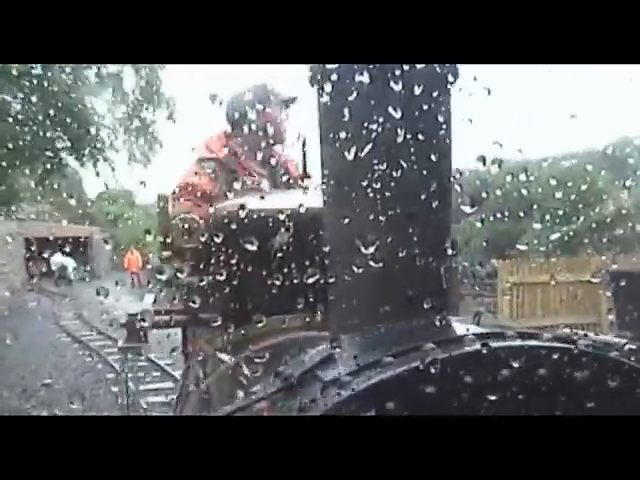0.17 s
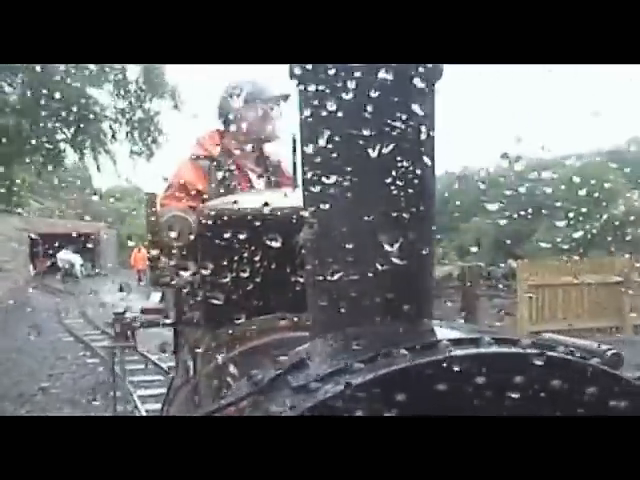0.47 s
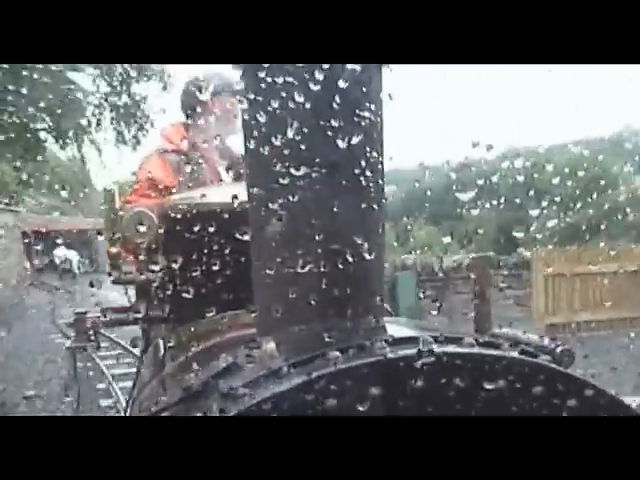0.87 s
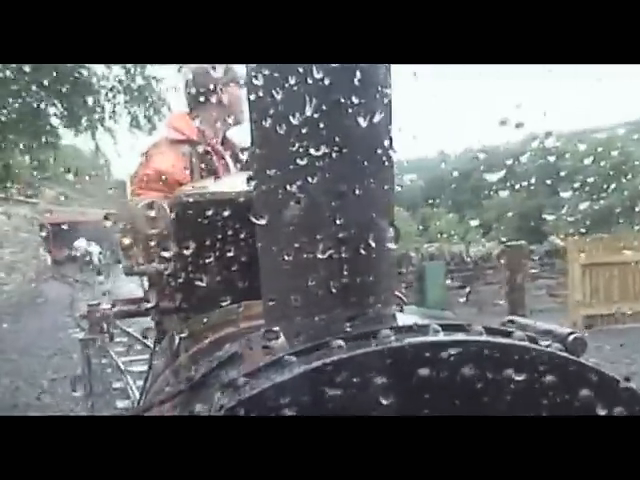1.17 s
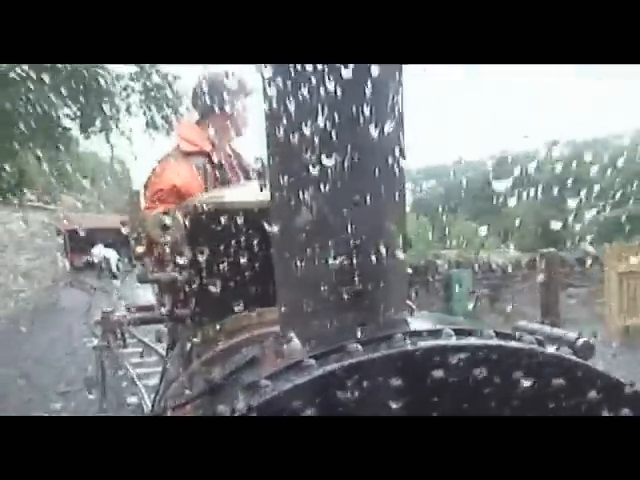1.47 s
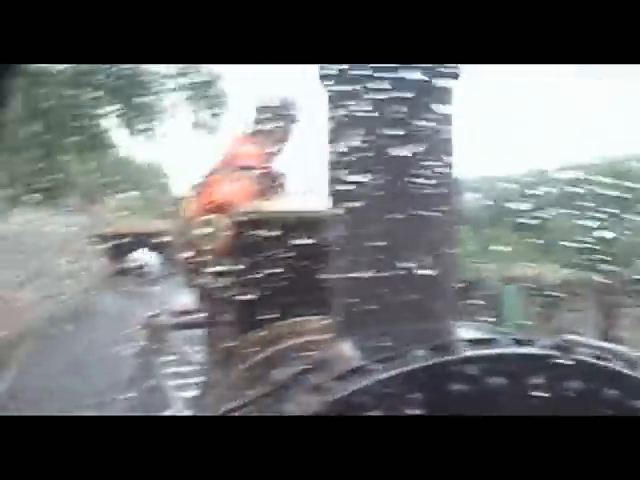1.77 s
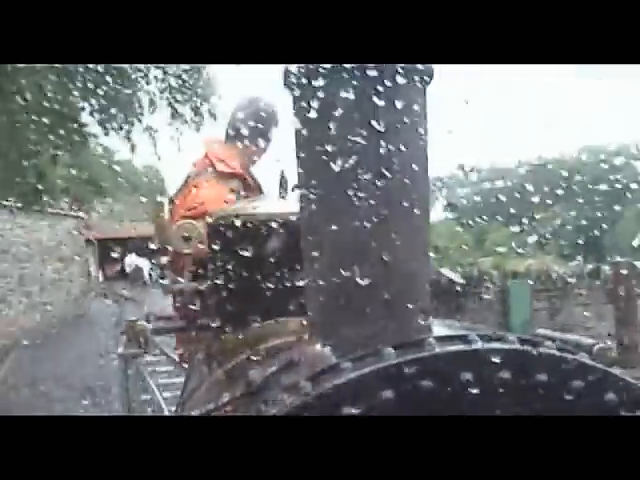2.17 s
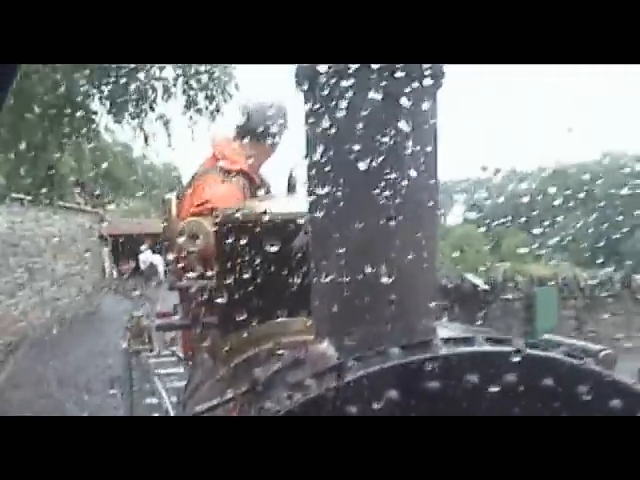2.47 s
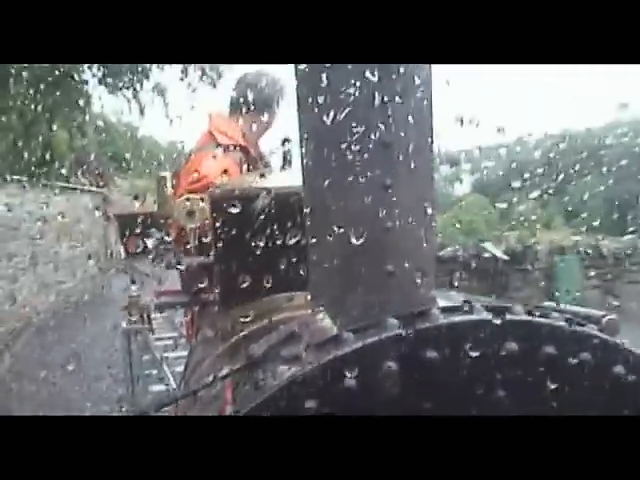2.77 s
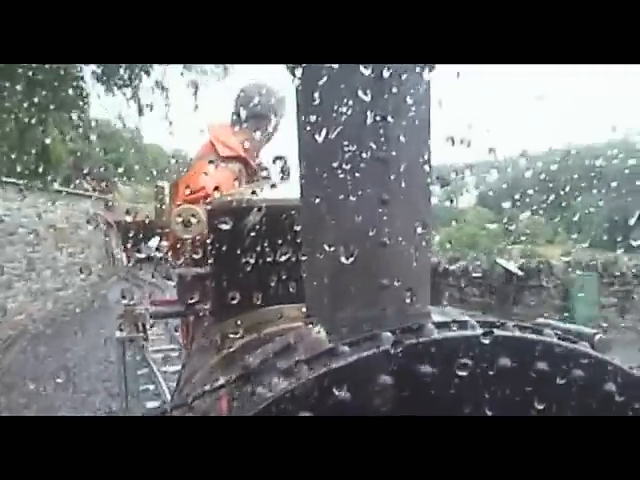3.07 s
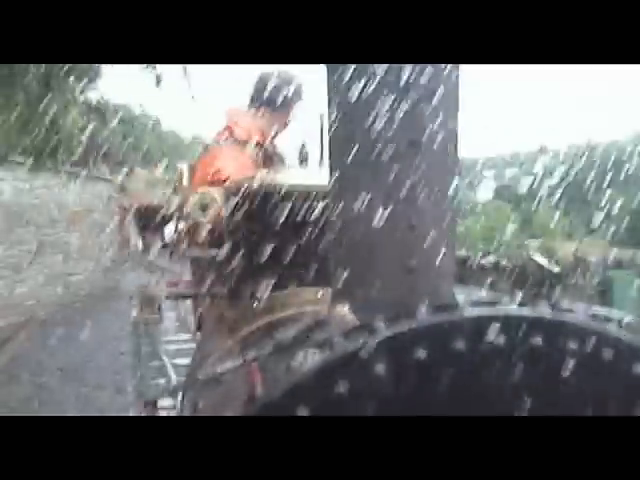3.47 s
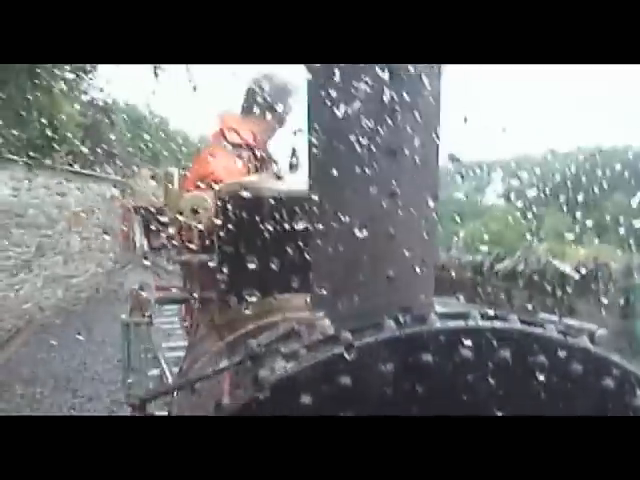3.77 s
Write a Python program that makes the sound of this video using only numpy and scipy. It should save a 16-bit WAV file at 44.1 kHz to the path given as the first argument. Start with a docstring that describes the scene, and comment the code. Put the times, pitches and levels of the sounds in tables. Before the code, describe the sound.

Low carriage rumble on a narrow track, with droning panels, iron clanks and very faint rain hiss

```python
"""A small carriage rumbles and drums in the rain behind a gently rolling narrow gauge steam locomotive.
Heard in stereo from the carriage seat: shaped noise makes the body rumble, and wavering tones make two
panels drum and the floor jolt. Couplings clank, ironwork clinks, a latch knocks and wheels scrape, as
noise bursts with ringing modes. Further down lie the wheels' roar, brief squeaks of narrow noise, and a
faint hiss of steam and rain."""
import sys
import numpy as np
from scipy import signal
from scipy.fft import rfft, irfft
from scipy.io import wavfile
from scipy.ndimage import uniform_filter1d

SR = 44100
rng = np.random.default_rng(int(sys.argv[2]) if len(sys.argv) > 2 else 0)


def generate_wav(signal):
    """Clip the signal to [-1, 1] and save it as 16-bit WAV at the path in sys.argv[1]."""
    frames = np.transpose(np.atleast_2d(signal))
    scaled = np.clip(frames, -1, 1) * 32767
    pcm = np.round(scaled).astype(np.int16)
    wavfile.write(sys.argv[1], SR, pcm)


N = 172431
TIME, HZ = np.arange(N) / SR, np.fft.rfftfreq(N, 1 / SR)


def amp(db):
    """Turns decibels into gain."""
    return 10 ** (np.asarray(db) / 20)


def unit(x):
    """Scales a sound to rms 1."""
    return x / np.sqrt(np.mean(x ** 2) + 1e-20)


def at_hz(points, hz=HZ):
    """Reads a spectrum table along a logarithmic frequency axis."""
    f, value = np.transpose(points)
    return np.interp(np.log(hz + 1), np.log(f + 1), value)


def curve(points, axis=1):
    """Reads one column of a time table at every sample."""
    rows = np.array(points)
    return np.interp(TIME, rows[:, 0], rows[:, axis])


def add(mix, s, sound):
    """Mixes a sound in at time s, cutting what runs past the end."""
    part = mix[:, max(round(s * SR), 0):][:, :sound.shape[1]]
    part += sound[:, :part.shape[1]]


def drift(rate_hz):
    """Chance wandering of rms 1, with little movement faster than the given rate."""
    lowpass = np.exp(-(HZ / rate_hz) ** 2) * (HZ > 0)
    return unit(irfft(rfft(rng.standard_normal(N)) * lowpass, N))


def lifted(peaks):
    """Gain of a set of broad resonances and hollows."""
    return amp(sum(db / (1 + ((HZ - hz) / (width / 2)) ** 2) for hz, width, db in peaks))


# stereo spread, nearly mono in the bass: (frequency [Hz], side relative to mid [dB])
WIDTH = [(40, -30.5), (140, -27.5), (260, -16), (500, -6), (1000, -9), (2500, -3.5), (5000, -7.5),
         (9000, -6.5)]


def noise(gain):
    """Stereo noise of a given colour, built from independent mid and side noises."""
    mid, side = rfft(rng.standard_normal((2, N)))
    side = side * amp(at_hz(WIDTH))
    return unit(irfft(np.array([mid + side, mid - side]) * gain, N))


def steadied(x, span_s, share):
    """Takes a share of the slow chance swells out of a noise."""
    power = uniform_filter1d((x ** 2).mean(0), max(int(span_s * SR), 1))
    return unit(x / (abs(power) + 1e-9) ** (share / 2))


# resonances of the carriage body around the seat: (frequency [Hz], width [Hz], level [dB])
CARRIAGE = [(36.7, 17, -4.5), (54.6, 14, 2), (98.6, 13, 0), (140, 27.3, 0), (168.5, 16.8, -0.5),
            (194.2, 18, -1), (224, 7.4, -2.5), (253.4, 30.3, -6), (315.3, 30.3, -7), (351, 25.5, -15.5),
            (502, 14, -25.5), (576, 16, -24)]
# sway of the rumble, used as departures from each column's mean:
# (time [s], deep bass level [dB], upper rumble level [dB])
SWAY = [(0, -39, -37), (.3, -42, -34.5), (.42, -40, -32), (.8, -42, -34), (1.0, -44.5, -32),
        (1.27, -35, -29), (1.4, -35, -31.5), (1.65, -36, -29), (1.87, -33, -33.5), (2.08, -37, -28.5),
        (2.35, -37, -32.5), (2.65, -36.5, -33), (2.87, -37, -32.5), (3.05, -42, -32), (3.38, -34.5, -30),
        (3.55, -32.5, -32), (3.75, -32, -35), (3.91, -34, -35)]
RUMBLE_DB, RUMBLE_SPLIT_HZ = -30.5, 78


def rumble():
    """Rail roughness shakes the springs and panels, heard as noise through the body's resonances."""
    power = sum(amp(db) ** 2 / (1 + ((HZ - hz) / (0.71 * width)) ** 2) ** 2 for hz, width, db in CARRIAGE)
    low_cut = (HZ / 22) ** 4 / (1 + (HZ / 22) ** 4)
    gain = np.sqrt(power) * low_cut
    out = np.zeros((2, N))
    for k, band in enumerate([HZ < RUMBLE_SPLIT_HZ, HZ >= RUMBLE_SPLIT_HZ]):
        level = curve(SWAY, axis=k + 1)
        sway_db = 0.92 * (level - level.mean())
        share = np.linalg.norm(gain * band) / np.linalg.norm(gain)
        body = steadied(noise(gain * band), span_s=0.11, share=0.4)
        out += share * body * amp(RUMBLE_DB + sway_db)
    return out


def panel(hz, wander_hz, level_db):
    """A loose panel hums on one wavering note whose level flutters."""
    turns = np.cumsum(hz + wander_hz * drift(9.43)) / SR
    return unit(np.sin(2 * np.pi * turns)) * amp(level_db + 1.5 * drift(27))


# the drumming panel, before its trim: (time [s], level [dB])
DRUMMING = [(0, -24), (.05, -30.5), (.09, -42.5), (.19, -38.5), (.255, -22), (.31, -42.5), (.53, -32.5),
            (.85, -38.5), (1.0, -27), (1.09, -29), (1.2, -25), (1.29, -39), (1.64, -43), (1.71, -25.5),
            (1.79, -44), (2.08, -38), (2.15, -23.5), (2.22, -38), (2.42, -35), (2.52, -23.5), (2.6, -39),
            (2.9, -29.5), (3.0, -43), (3.27, -38), (3.35, -28.5), (3.5, -33.5), (3.68, -47), (3.85, -26.5),
            (3.91, -51)]
# a smaller panel that drones higher, before its trim: (time [s], level [dB])
DRONING = [(0, -53), (.3, -43.5), (.52, -35), (.75, -49.5), (1.0, -34), (1.22, -36), (1.36, -43.5),
           (1.55, -37.5), (1.72, -34.5), (1.87, -49.5), (2.05, -32), (2.25, -39.5), (2.6, -45),
           (3.0, -37.5), (3.3, -44.5), (3.5, -38), (3.72, -50), (3.87, -38.5)]
DRUM_HZ, DRUM_WANDER_HZ, DRUM_TRIM_DB = 164.1, 5.43, -2.5
DRONE_HZ, DRONE_WANDER_HZ, DRONE_TRIM_DB = 259.4, 4.93, -2


def drumming_panels():
    """Two panels drum above the rest of the body, each swelling on its own note."""
    drum = panel(DRUM_HZ, DRUM_WANDER_HZ, DRUM_TRIM_DB + curve(DRUMMING))
    drone = panel(DRONE_HZ, DRONE_WANDER_HZ, DRONE_TRIM_DB + curve(DRONING))
    return drum + drone


# jolts from uneven rail, felt in the floor: (time [s], frequency [Hz], peak level [dB])
JOLTS = [(0.366, 91.6, -27.5), (0.914, 96.7, -29), (1.221, 247, -26), (1.495, 192, -27.5),
         (1.962, 188, -31.5), (2.115, 323, -30), (2.639, 96, -31), (2.80, 185, -27), (2.826, 153, -26),
         (2.88, 133, -28), (3.166, 235.5, -29), (3.304, 129, -22.5), (3.37, 129.4, -23.5)]
JOLT_RISE_S = .022


def jolts():
    """Bumps in the track make low tones swell and fade in the carriage floor."""
    t, out = np.arange(SR // 3) / SR, np.zeros((2, N))
    swell = (t / JOLT_RISE_S * np.exp(1 - t / JOLT_RISE_S)) ** 2
    for (s, hz, db), phase in zip(JOLTS, rng.random(len(JOLTS))):
        tone = np.sin(2 * np.pi * (hz * t + phase))
        add(out, s, (amp(db) * swell * tone)[None])
    return out


# ringing of the wheels and frame, also colouring every blow: (frequency [Hz], width [Hz], lift [dB])
FRAME = [(568, 11, 4.5), (624, 20, 6.5), (715, 33, 4.5), (895, 140, 3), (996, 13, 4.5), (1063, 53, 7),
         (1195, 97, 4), (1332, 68, 4), (1620, 16, 6), (1927, 21, 4), (2550, 330, 2.5), (3980, 39, 6)]
# centres of the thud, body, clang, edge and sizzle bands: frequency [Hz]
BANDS_HZ = [350, 750, 1900, 4200, 8000]
# t60 of each band's clatter: share of the blow's t60 [ratio]
BAND_DECAY = [1.38, 1.22, 1.28, 0.76, 0.63]
HOLD_S, TAIL_DB, TAIL_T60_S = 0.0025, -23.5, 0.73
CHATTER_DB, RING_FLUTTER_DB = 1.5, 1.5  # rms
FAVOUR_SPREAD = .04  # share of its frequency within which a favoured note lifts the modes


def clatter_bands(body):
    """Splits noise coloured by the frame and the struck part into five overlapping bands."""
    logs = np.log(BANDS_HZ)
    low_cut, high_cut = 1 / (1 + (220 / (HZ + 1)) ** 4), 1 / (1 + (HZ / 9300) ** 12)
    colour = low_cut * high_cut / (HZ + 300) ** 1.41 * lifted(FRAME + body)
    return [noise(colour * np.sqrt(np.interp(np.log(HZ + 1), logs, row))) for row in np.eye(len(logs))]


def blows(events, modes, body, clatter_db):
    """Each contact chatters briefly, then dies away as a dense clatter and clear modes of the iron."""
    logs, out = np.log(BANDS_HZ), np.zeros((2, N))
    bands = clatter_bands(body)
    chatter, flutter = amp(CHATTER_DB * drift(200)), RING_FLUTTER_DB * drift(90)
    for s, rise, t60, ring_db, *columns in events:
        levels, favoured = columns[:len(logs)], columns[len(logs):]
        start = round(s * SR)
        span = slice(start, start + SR // 2)  # a blow lasts half a second at most
        t = TIME[span] - TIME[span][0]
        attack = np.minimum(t / max(rise, 1e-4), 1)
        after = np.maximum(t - rise - HOLD_S, 0)
        tail = amp(TAIL_DB - 60 * after / TAIL_T60_S)
        sound = np.zeros((2, len(t)))
        for band, db, share in zip(bands, levels, BAND_DECAY):
            decay = np.hypot(amp(-60 * after / (t60 * share)), tail)
            sound += band[:, span] * amp(db + clatter_db) * decay
        sound *= chatter[span]
        chances = rng.uniform(-1, 1, (len(modes), 3))
        for (hz, db, ring_s), (phase, spread, detune) in zip(modes, chances):
            level = np.interp(np.log(hz), logs, levels) + db + ring_db
            if favoured:
                favoured_hz, lift_db = favoured
                level += lift_db * np.exp(-(np.log(hz / favoured_hz) / FAVOUR_SPREAD) ** 2)
            stereo_phase = spread * np.array([[1], [-1]]) / 2
            angle = 2 * np.pi * hz * (1 + 0.0038 * detune) * t + np.pi * phase + stereo_phase
            rattle = np.roll(flutter, int(spread * N))[span]
            sound += amp(level + rattle - 60 * after / ring_s) * np.sin(angle)
        add(out, s, attack * sound)
    return out


# coupling blows; where one lands decides which note it favours. Band levels are before the clatter trim:
# (time [s], rise [s], t60 [s], ringing relative to bands [dB], thud [dB], body [dB], clang [dB],
#  edge [dB], sizzle [dB], favoured note [Hz], its lift [dB])
CLANKS = [ (.351, 0.0065, .13, -4, -31.5, -36.5, -51, -56, -82, 895, 3),
          (.373, .0035, .13, -8.5, -42, -44.5, -47.5, -58, -73, 1355, 9),
          (1.240, 0.0067, 0.1, -5.5, -27.5, -35, -41, -48, -80, 1790, -1),
          (1.544, 0.0045, 0.18, -3, -35, -42.5, -50, -52, -64, 962, 4.5),
          (1.671, 0.0074, 0.21, -7, -41, -43, -35.5, -43.5, -52.5, 895, 22.5),
          (1.712, 0.014, .14, 2, -42, -50, -49.5, -53, -76, 1790, 7),
          (1.741, .0048, .16, -3, -41.5, -41.5, -41, -47, -67, 3695, 10),
          (1.751, .003, .08, -9, -47, -46, -47, -59, -75, 1052, 9),
          (2.121, 0.0027, .12, -12, -32.5, -32, -49, -73.5, -75, 895, 8),
          (3.257, .004, .2, 0, -28, -33, -33.5, -35.5, -56, 962, 3),
          (3.269, .0024, .13, 2, -33, -37.5, -36.5, -48, -65, 563, 4),
          (3.290, .002, .1, -5, -37, -44, -43, -56, -68, 1052, 6),
          (3.343, 0.0038, 0.18, -8, -47, -42, -45.5, -48.5, -66, 1355, 22),
          (3.367, .003, .1, -3, -55, -53, -52, -61, -74, 1355, 10),
          (3.388, 0.0056, 0.15, -11, -52, -45.5, -46, -60, -76, 1135, 9),
          (3.433, 0.0025, 0.072, 0, -54, -44, -56, -66, -80, 1355, 9),
          (3.587, 0.0028, 0.18, -12, -61, -35.5, -40.5, -53, -69, 1355, 13),
          (3.602, 0.0025, 0.17, -3.5, -57, -43, -45.5, -50.5, -59.5, 960, 10),
          (3.634, 0.0093, 0.39, 2, -58, -41.5, -46.5, -59, -77, 962, 4.5)]
# modes of the couplings: (frequency [Hz], relative level [dB], t60 [s])
COUPLING = [(470, -6, .15), (563, -2, .16), (895, -12, .19), (962, -4, .2), (1052, -11, .22),
            (1135, -13, .18), (1262, -12, .14), (1355, -13, .22), (1590, -11, .16), (1790, -14, .12),
            (1912, -9, .15), (1956, -11, .15), (2243, -10, .17), (2325, -8.5, .16), (2890, -17, .12),
            (3695, -11, .135), (4850, -12, .08)]
# body of the couplings, colouring their clatter: (frequency [Hz], width [Hz], lift [dB])
COUPLING_BODY = [(1630, 390, 2.5), (2420, 200, 2.5), (2820, 280, -3), (3760, 210, 2.5), (4270, 250, -0.5),
                 (4930, 570, 2.5)]


def couplings():
    """Couplings clank, each blow ringing their modes and lifting those near one favoured note."""
    return blows(CLANKS, COUPLING, COUPLING_BODY, clatter_db=-5)


# light ironwork clinks, band levels before the clatter trim: (time [s], rise [s], t60 [s],
#  ringing relative to bands [dB], thud [dB], body [dB], clang [dB], edge [dB], sizzle [dB])
CLINKS = [ (.164, .0045, 0.17, -5, -58, -45.5, -62, -60, -61.5),
          (.339, 0.003, 0.17, -5.5, -47, -42, -55, -56, -55.5),
          (1.825, 0.0064, 0.094, -4.5, -54, -48.5, -53, -63, -66),
          (1.967, .002, .12, -8, -32, -41.5, -51, -54.5, -50.5),
          (2.035, 0.0056, .15, -5, -44.5, -44.5, -67, -64.5, -71),
          (3.173, 0.0039, 0.21, -7, -48, -51, -68, -60.5, -63),
          (3.225, 0.015, 0.46, -11, -49.5, -37, -51, -62, -61.5),
          (3.523, 0.0016, 0.23, -4.5, -47, -62, -41.5, -46, -52.5)]
# modes of the light ironwork: (frequency [Hz], relative level [dB], t60 [s])
IRONWORK = [(1120, -2, .16), (1292, -4, .24), (1863, -5, .2), (2180, -7, .2), (2842, -13, .2),
            (4020, -3, .13), (4172, -6, .11), (6568, -2, .1), (6665, -7, .11), (7930, -6, .13)]
# body of the ironwork, colouring its clatter: (frequency [Hz], width [Hz], lift [dB])
IRONWORK_BODY = [(1550, 250, -6.5), (2700, 380, -5.5), (4080, 300, 6.5), (4560, 300, 2.5), (5250, 310, -8),
                 (7150, 200, -3.5)]


def ironwork():
    """Light ironwork clinks, its modes reaching high into the treble."""
    return blows(CLINKS, IRONWORK, IRONWORK_BODY, clatter_db=-3)


# two knocks of a loose latch, band levels before the clatter trim: (time [s], rise [s], t60 [s],
#  ringing relative to bands [dB], thud [dB], body [dB], clang [dB], edge [dB], sizzle [dB])
LATCH_KNOCKS = [ (.720, 0.0052, 0.23, -6, -42, -39.5, -46, -50.5, -55.5),
                (3.811, 0.0025, 0.15, -7.5, -60, -39.5, -45.5, -52.5, -57)]
# modes of the latch: (frequency [Hz], relative level [dB], t60 [s])
LATCH = [(716, -11, .25), (894, -9, .25), (1136, -6, .2), (1240, -6, .18), (2020, -8, .18), (2095, -5, .2),
         (3570, -7, .15), (3700, -4, .14), (3845, -2.5, .14), (4165, -5, .12), (5815, -9, .12),
         (7910, -7, .12)]
# body of the latch, colouring its clatter: (frequency [Hz], width [Hz], lift [dB])
LATCH_BODY = [(1110, 270, 8), (1520, 260, -8.5), (2160, 400, 4), (3250, 350, -10), (3740, 450, 8),
              (4730, 460, -5)]


def latch():
    """A loose latch knocks twice, ringing modes of its own."""
    return blows(LATCH_KNOCKS, LATCH, LATCH_BODY, clatter_db=-1.5)


# wheel scrapes on the rails, band levels before the clatter trim: (time [s], rise [s], t60 [s],
#  ringing relative to bands [dB], thud [dB], body [dB], clang [dB], edge [dB], sizzle [dB])
SCRAPES = [ (.575, 0.012, 0.21, -10, -40.5, -34.5, -48, -58, -80),
           (.594, 0.0032, 0.23, -9, -42, -40, -49, -52, -79),
           (.870, 0.023, 0.5, -11, -58, -41, -52, -61, -67),
           (1.270, 0.025, 0.15, -11, -33.5, -51, -50, -69, -83),
           (2.512, 0.011, 0.22, -15.5, -45.5, -38.5, -49.5, -71, -80),
           (2.611, 0.007, 0.87, -11, -63, -38, -55.5, -60.5, -81),
           (2.675, 0.024, 0.14, -6, -57, -39, -51.5, -61, -80)]


def scrapes():
    """Wheels scrape on the rails as noise bursts that also ring the coupling modes faintly."""
    return blows(SCRAPES, COUPLING, [], clatter_db=-6.0)


# colour of the roar under the carriage: (frequency [Hz], relative level per Hz [dB])
ROLL = [(100, 0), (330, 9.5), (480, 5), (750, -5.5), (1000, -10.5), (1350, -11), (1700, -18.5), (2200, -34),
        (3000, -32.5), (5000, -37), (11000, -65)]
# rolling noise, about which it flickers: (time [s], level [dB])
ROLLING = [(0, -46.5), (.5, -45.5), (1.0, -44), (1.4, -41), (1.9, -43.5), (2.3, -45), (2.5, -44.5),
           (2.8, -43.5), (3.1, -41), (3.4, -40), (3.75, -49.5), (3.91, -43)]


def wheels():
    """The gritty roar of wheels rolling on wet rail: noise through the frame's ringing, flickering."""
    roar = noise(amp(at_hz(ROLL)) * lifted(FRAME))
    return roar * amp(curve(ROLLING) + 0.94 * drift(28) + 1.0 * drift(130))


# squeaks in the running gear: (centre time [s], half length [s], level [dB], tilt [dB per octave])
SQUEAKS = [(0.138, 0.025, -59.5, -7), (0.2, 0.025, -56.5, -6), (0.38, .016, -51, -10.5),
           (0.621, 0.042, -57.5, -13.5), (2.351, 0.0065, -59, 0), (2.374, 0.014, -55, 3),
           (2.636, 0.053, -61.5, 3), (2.821, 0.021, -58.5, 2)]
# notes of the squeaks; the tilt turns about the second: (frequency [Hz], relative level [dB])
SQUEAK_MODES = [(695, -3), (1355, 2), (1720, -4), (2347, -14), (3410, -19.5)]
SQUEAK_WIDTH_HZ = 23.4


def squeaks():
    """Rubbing iron in the running gear sings briefly, always on the same few rough notes."""
    out = np.zeros((2, N))
    pivot_hz = SQUEAK_MODES[1][0]
    for hz, mode_db in SQUEAK_MODES:
        octaves = np.log2(hz / pivot_hz)
        swell = np.zeros(N)
        for s, half, db, tilt in SQUEAKS:
            swell += amp(db + tilt * octaves) * np.exp(-((TIME - s) / half) ** 2 / 2)
        note = noise(1 / (1 + ((HZ - hz) / SQUEAK_WIDTH_HZ) ** 2))
        out += swell * amp(mode_db) * steadied(note, span_s=0.044, share=0.28)
    return out


# colour of the background hiss: (frequency [Hz], relative level per Hz [dB])
HISS = [(500, -7), (2000, 5), (3500, -2), (5500, -3.5), (7000, -5), (8300, -3), (9500, -9), (10700, -11.5),
        (12000, -25)]
# background hiss, about which it flickers: (time [s], level [dB])
HISSING = [(0, -65), (.6, -65), (1.2, -64.5), (1.4, -63.5), (1.7, -66.5), (2.0, -65), (2.15, -68),
           (2.55, -68.5), (2.78, -66.5), (3.15, -66.5), (3.5, -70), (3.91, -69)]
# colour of one soft breath of steam: (frequency [Hz], relative level per Hz [dB])
WISP_COLOUR = [(1000, 0), (3000, 3), (4900, 2), (6500, -14), (11000, -26)]
WISP_S, WISP_WIDTH_S, WISP_DB = 1.4, 0.17, -64.5


def steam_and_rain():
    """Faint flickering noise for steam and rain, with one soft wisp that swells and fades."""
    swell = np.exp(-((TIME - WISP_S) / WISP_WIDTH_S) ** 2 / 2)
    wisp = noise(amp(at_hz(WISP_COLOUR))) * amp(WISP_DB) * swell
    hiss = noise(amp(at_hz(HISS))) * amp(curve(HISSING) + .5 * drift(22) + 0.58 * drift(400))
    return hiss + wisp


def scene():
    """Everything heard from the carriage seat."""
    body = rumble() + drumming_panels() + jolts()
    iron = couplings() + ironwork() + latch() + scrapes()
    return body + iron + wheels() + squeaks() + steam_and_rain()


# balance of the stereo microphones: (frequency [Hz], left minus right [dB])
LEAN = [(130, -.1), (260, .8), (500, -1.6), (1000, -.7), (2000, 0), (8000, -.3)]
LOW_CUT_HZ, EDGE_HZ = 22, 11600


def record(dry):
    """The microphones' slight left-right colour and a low cut, short end fades, then the band limit."""
    low_cut = (HZ / LOW_CUT_HZ) ** 6 / (1 + (HZ / LOW_CUT_HZ) ** 6)
    lean = amp(at_hz(LEAN) * np.array([[.5], [-.5]]))
    leaned = irfft(rfft(dry) * low_cut * lean, N)
    ends = np.minimum(np.minimum(TIME, TIME[::-1]) / .003, 1)  # 3 ms fades
    taps = signal.firwin(255, EDGE_HZ, window=("kaiser", 9), fs=SR)
    return signal.oaconvolve(leaned * ends, taps[None], "same")


dry = scene()
out = record(dry)
generate_wav(out)
```